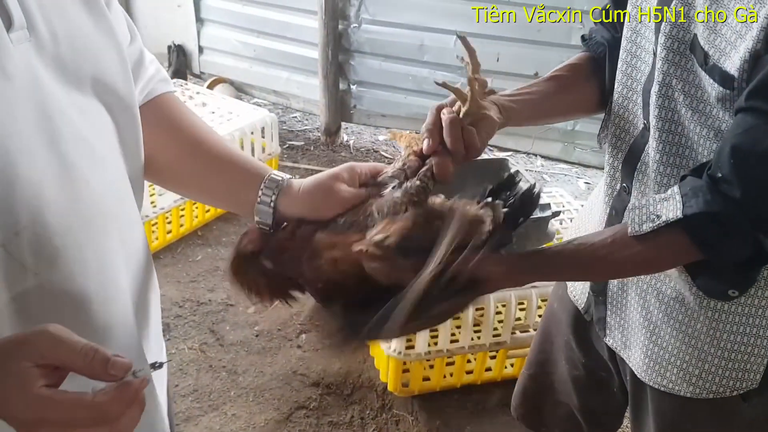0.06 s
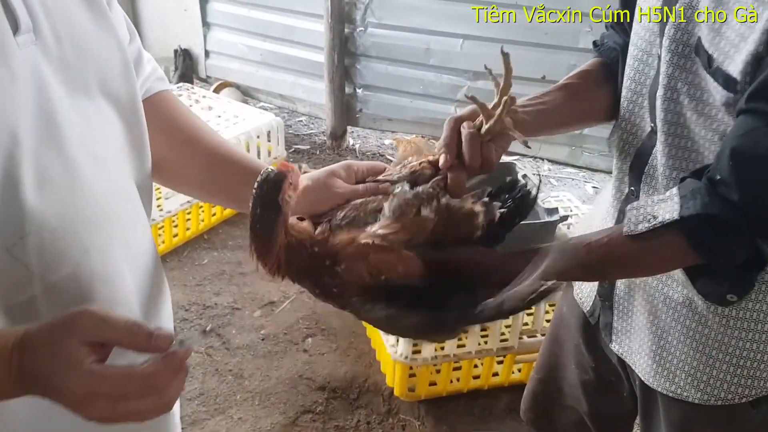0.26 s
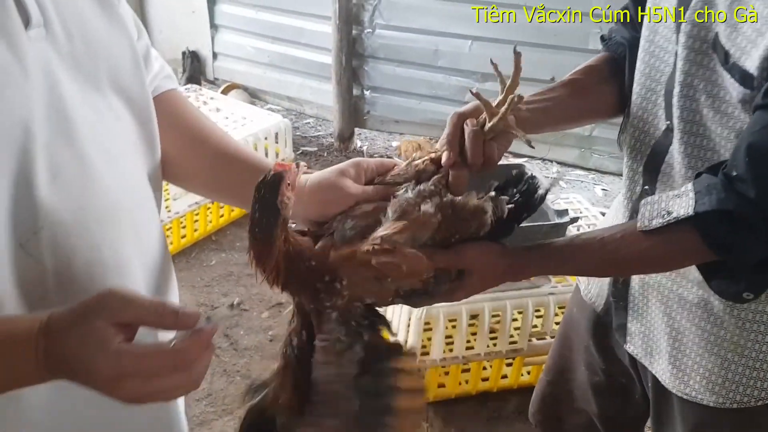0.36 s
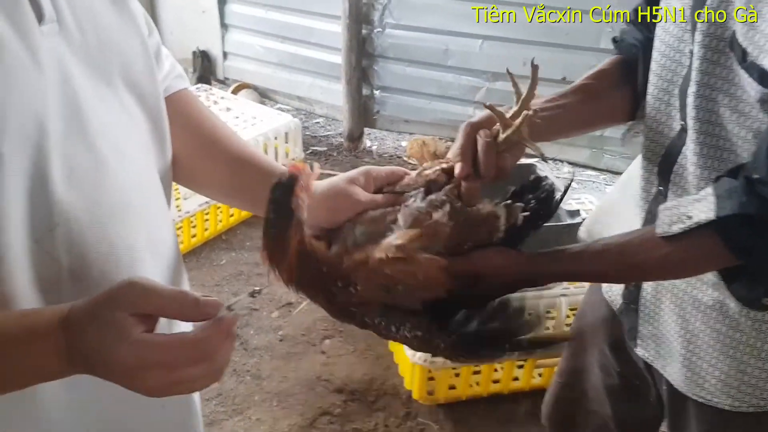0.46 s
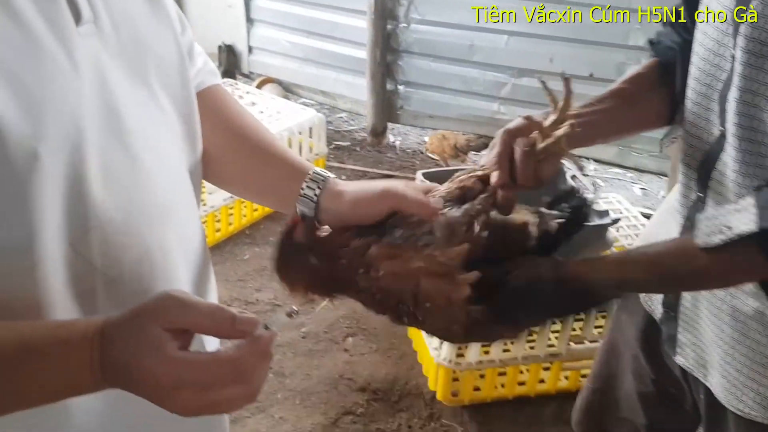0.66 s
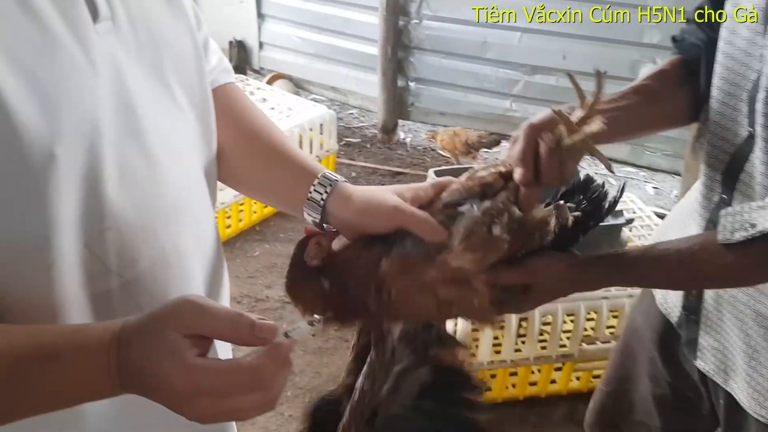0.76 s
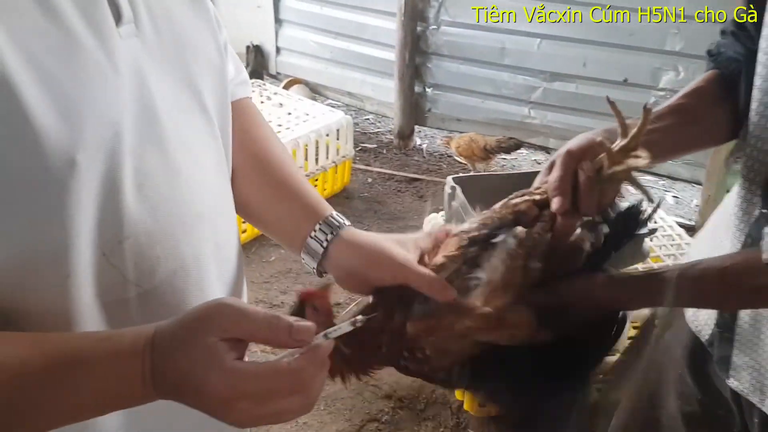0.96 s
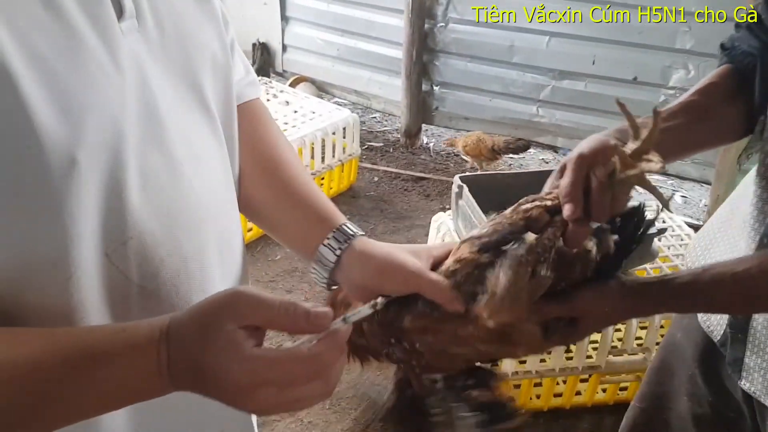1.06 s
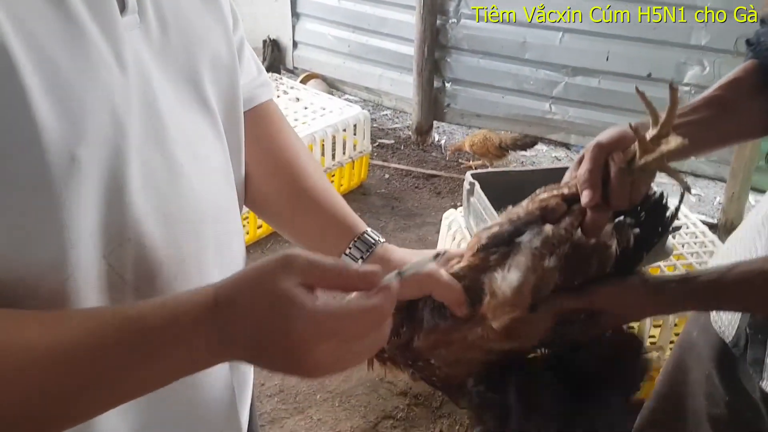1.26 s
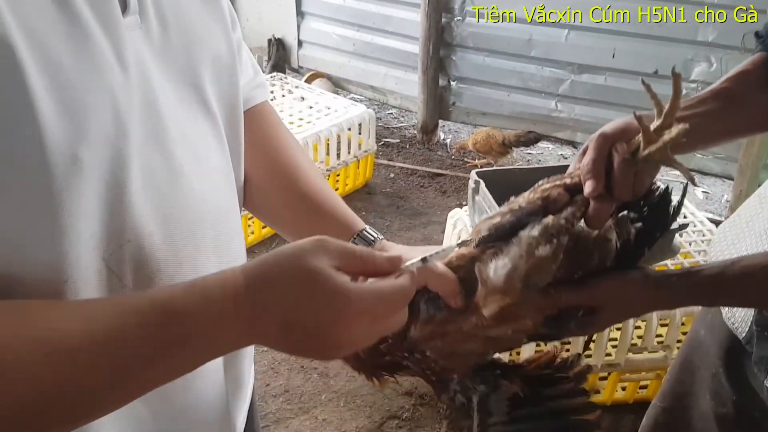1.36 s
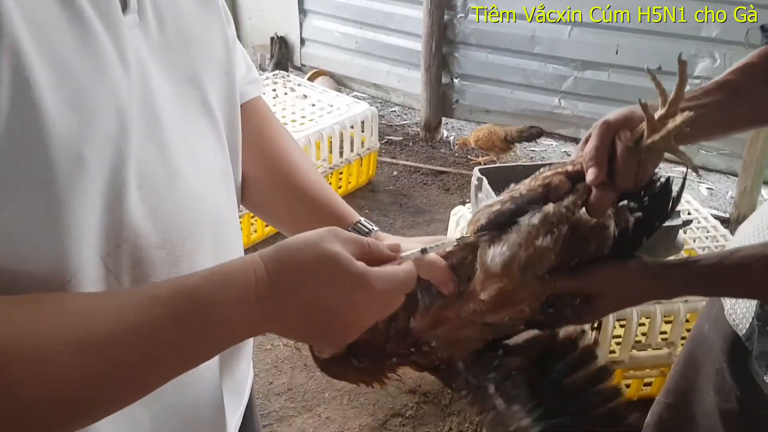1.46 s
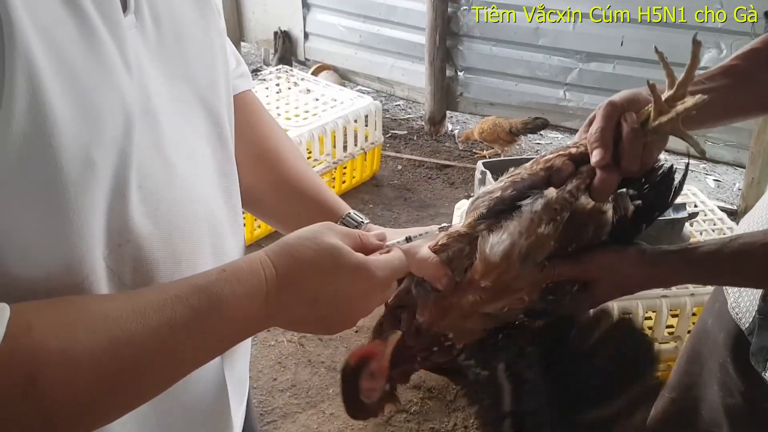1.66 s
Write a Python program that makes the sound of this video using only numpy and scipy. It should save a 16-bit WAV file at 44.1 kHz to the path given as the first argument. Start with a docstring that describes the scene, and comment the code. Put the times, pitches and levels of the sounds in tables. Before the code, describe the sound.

Two hoarse squawks come from a hen near the microphone, each after a thin, faint whine. Her feathers brush and click on the hands holding her, and a distant cluck and peep follow over a shed's soft rumble.

```python
"""Over a soft rumble in a sheet-metal shed, a hen held close by whines, her feathers brushing the hands.
She squawks: pulses and breath ring in her throat, swell into a rasp, then fall in pitch and colour as
the beak closes. She whines again and, with a rustle and a click, gives a second squawk. Two more clicks
follow, then, farther off, a low cluck and another bird's peep.
All along, the right microphone hears far more than the left."""
import sys
import numpy as np
from scipy import signal
from scipy.fft import rfft, irfft, next_fast_len
from scipy.io import wavfile
from scipy.ndimage import uniform_filter1d, minimum_filter1d, map_coordinates

SR = 44100
rng = np.random.default_rng(int(sys.argv[2]) if len(sys.argv) > 2 else 0)


def wav_out(sig):
    """Save sig, one row per channel (or a flat mono array), as 16-bit PCM at SR to the path in sys.argv[1]."""
    wavfile.write(sys.argv[1], SR, np.round(np.clip(np.atleast_2d(sig).T, -1, 1) * 32767).astype(np.int16))


N = 74970

# Tone colour of the rumble and of the faint hiss (frequency [Hz], level [dB]); all levels are relative
RUMBLE_COLOUR = [(20, -27.5), (35, -8.5), (48, -5.5), (75, -1), (105, -1), (150, -6.5), (190, -8.5),
                 (260, -16), (380, -27.5), (700, -36), (2000, -61)]
HISS_COLOUR = [(200, -45), (1200, 6), (2500, 4), (5000, -4), (8200, -4), (9400, 9), (10500, -6),
               (15500, -15.5)]
# How alike the noise is on the left and right (frequency [Hz], likeness [0-1])
STEREO_LIKENESS = [(50, 0.43), (500, 1), (1200, 0.18), (8000, 0.083)]
# The two thin whines, one table each (time [s], pitch [Hz], level [dB])
WHINE_NOTES = [
    [(0, 1265, -48), (.07, 1291, -51.5), (.11, 1258, -64.5), (.16, 1168, -56)],
    [(.70, 1274, -58), (.735, 1240, -53), (.765, 1275, -47), (.80, 1240, -64)],
]
# A whine's harmonics, the whole multiples of its pitch, lowest first (level [dB])
WHINE_HARMONICS = [0, -1.9, -29]
# Feathers brushing the hands (time [s], thump [dB], rustle [dB], rise [s], time to fade 60 dB [s])
FEATHER_BRUSHES = [(0.089, -69, -60, 0.003, 0.43), (0.158, -71, -46.5, 0.016, 0.22),
                   (.348, -36.5, -58, 0.0046, 0.12), (0.596, -37, -65, 0.0035, 0.19),
                   (.655, -61, -55.5, 0.036, 0.95), (0.803, -34.5, -47.5, 0.0025, .06),
                   (.814, -34.5, -37, 0.0079, 0.057), (1.264, -38.5, -42, .001, 0.023),
                   (1.277, -45.5, -41, 0.0019, 0.099), (1.684, -72, -52, 0.0081, 0.046)]
# Tone colour of a brush's thump and of its rustle (frequency [Hz], level [dB])
THUMP_COLOUR = [(60, -17), (180, 7.5), (330, -7), (550, 2), (1000, 0.5), (2500, -8.5), (6000, -39)]
RUSTLE_COLOUR = [(400, -17), (1500, 3.5), (3200, 1), (6000, -1.5), (9000, -8.5), (16000, -9.5)]
# The squeak that leads into the first squawk (time [s], pitch [Hz], level [dB])
SQUEAK_NOTE = [(.17, 1171, -53.5), (.198, 1286, -42), (.208, 1291, -25), (.222, 1348, -29),
               (.238, 1210, -60)]
# Its harmonics, lowest first (level [dB])
SQUEAK_HARMONICS = [-39.5, 4, -45.5, -18, -31.5, -35]
# The throat in each squawk (time [s], level [dB], ringing frequency [Hz], lowest harmonic [dB])
SQUAWK_THROATS = [
    [(0.218, -31, 2850, -78), (0.242, -28, 2860, -63), (0.332, -23.5, 2600, -52), (0.352, -27.5, 2880, -50),
     (0.4, -14, 2540, -33), (0.466, -17, 2600, -23), (0.48, -14, 2370, -38), (0.49, -20, 2170, -20),
     (0.524, -15.5, 1770, -24.5), (0.586, -30, 1250, -32.5), (0.596, -24, 1140, -35.5),
     (0.62, -34.5, 1200, -53)],
    [(0.83, -39, 2780, -65), (0.864, -25.5, 2810, -53), (0.958, -29, 3050, -66), (1.092, -19, 3100, -45),
     (1.108, -16.5, 2850, -29), (1.128, -15.5, 2270, -23.5), (1.156, -21.5, 1840, -30),
     (1.174, -23.5, 1463, -28.5), (1.2, -43, 1300, -44)],
]
# The voice in each squawk (time [s], pitch [Hz], roughness [0-1], sharpness of the ringing [Q])
SQUAWK_VOICES = [
    [(.22, 794.5, 0.91, 2.65), (.27, 829.4, 0.83, 1.8), (.31, 849.4, 0.43, 1.83), (.36, 853, 0.88, 1.14),
     (.39, 866.7, 0.56, 2.4), (.425, 846.2, 0.42, 2.1), (.46, 796.7, 0.46, 1.74), (.495, 790.6, 0.83, 1.86),
     (.527, 772.2, 0.24, 1.2), (.545, 575, 0.71, 1.6), (.572, 543.3, 0.74, 0.82), (.61, 357.7, 1, 5.4)],
    [(.84, 671.2, 0.42, 0.93), (.882, 713.3, 0.18, 3.4), (.897, 672, 0.27, 1.2), (.932, 690.2, 0.38, 2.1),
     (.948, 655.4, 0.22, 2.7), (1.0, 659.1, 0.3, 2.5), (1.032, 711.8, 0.65, 2.7), (1.06, 703.4, 0.77, 1.9),
     (1.1, 822.6, 0.71, 2.25), (1.132, 806.4, 0.71, 1.67), (1.148, 613.5, 0.05, 0.62),
     (1.166, 498, 0.64, 1.44), (1.19, 436.4, .7, 1.5)],
]
# Tone colour of the squawks' treble (frequency [Hz], level [dB])
TREBLE_COLOUR = [(3300, -18), (4300, -15), (4900, -23.5), (5550, -17), (6400, -6.5), (7500, 12.5),
                 (8200, -22), (9200, 7.5), (10200, 2.5), (11500, 10), (13500, 7), (16000, 4)]
# Treble against the throat at each squawk's peak (level [dB])
SQUAWK_TREBLES = [-19, -22]
# Feathers clicking on the hands (time [s], level [dB], centre [Hz], time to fade 60 dB [s])
FEATHER_CLICKS = [(.8203, -14, 13500, 0.0011), (1.2758, -28.5, 13100, 0.0017), (1.369, -47.5, 4670, 0.0113)]
# Tone colour of a click (frequency [multiple of the centre], level [dB])
CLICK_COLOUR = [(.05, -15), (.35, -10.5), (.65, -4.5), (1, 9), (1.25, 9.5), (1.6, -19.5)]
# A high whistle inside the second squawk (time [s], pitch [Hz], level [dB])
HIGH_NOTE = [(.925, 4330, -62), (.95, 4615, -30), (.97, 4450, -43), (.985, 4570, -35)]
# The cluck's harmonics, lowest first (level [dB])
CLUCK_HARMONICS = [-4, 1, 5.5, -22, -0.5, -8, -6.5, -10, -23, -20, -21, -23.5, -20, -28, -30, -34.5, -23,
                   -19, -39]
# Tone colour of the cluck's grit (frequency [Hz], level [dB])
GRIT_COLOUR = [(100, -12), (200, 15.5), (350, -5.5), (700, 5), (1800, -25), (2500, -36), (3300, -20),
               (4100, -11.5), (5000, -25.5), (12000, -35)]
# The other bird's peep (time [s], pitch [Hz], level [dB])
PEEP_NOTE = [(1.605, 2120, -79), (1.626, 1823, -52), (1.642, 1950, -46.5), (1.668, 2112, -46),
             (1.68, 2141, -51), (1.69, 1940, -39), (1.7, 1900, -64)]
# Its harmonics, lowest first (level [dB])
PEEP_HARMONICS = [0.5, -3.5, -13.5, -21]
# How long the shed rings (frequency [Hz], time to fade 60 dB [s])
SHED_FADE = [(150, 0.68), (700, 0.28), (2000, 0.26), (7000, 0.3), (15000, 0.24)]
# Muffling of the left microphone (frequency [Hz], gain [dB])
LEFT_MUFFLING = [(60, -14.5), (200, -18.5), (600, -15.5), (1290, -11), (2380, -14.5), (4400, -21.5),
                 (6000, -25), (8500, -12.5), (13000, -16)]

PULSE_SPREAD = 0.45  # the windpipe spreads each pulse over its cycle [radians]


def amp(db):
    """Turn decibels into a multiplier."""
    return 10 ** (np.asarray(db) / 20)


def unit(x):
    """Scale x to an average (rms) level of 1."""
    return x / np.sqrt(np.mean(x ** 2) + 1e-20)


def clock():
    """The time of each sample in seconds."""
    return np.arange(N) / SR


def along(points, hz):
    """Read between (frequency, value) points on a log scale."""
    frequencies, values = np.transpose(points)
    return np.interp(np.log(hz + 1), np.log(frequencies + 1), values)


def curves(rows):
    """One value per sample for each column after the time."""
    times, *columns = np.transpose(rows)
    return [np.interp(clock(), times, column) for column in columns]


def gate(start, end, rise=0.002, fade=0.024):
    """A volume that rises at start and dies away after end, all in seconds."""
    t = clock()
    return np.clip((t - start) / rise, 0, 1) * np.exp(-np.maximum(t - end, 0) / fade)


def wobble(rate):
    """A smooth curve through `rate` random values a second."""
    return map_coordinates(rng.standard_normal(N // 8), [clock() * rate], mode="wrap")


def filtered(x, response):
    """Turn each frequency in x up or down by response(hz)."""
    size = next_fast_len(N + SR // 2)
    return irfft(rfft(x, size) * response(np.fft.rfftfreq(size, 1 / SR)), size)[..., :N]


def coloured(x, colour):
    """Give x a tone colour, at level 1."""
    return unit(filtered(x, lambda hz: amp(along(colour, hz))))


def noise(colour):
    """Fresh noise with a tone colour."""
    return coloured(rng.standard_normal(N), colour)


def steady(x, samples=900):
    """Even out slow changes in level."""
    return x / np.sqrt(np.abs(uniform_filter1d(x * x, samples)) + 1e-12)


def background(colour):
    """Steady stereo noise, more alike on both sides in the bass."""
    turn = lambda hz: np.arccos(np.clip(along(STEREO_LIKENESS, hz), -1, 1)) / 2
    shares = lambda hz: np.array([np.cos(turn(hz)), np.sin(turn(hz))])
    mid, side = filtered(rng.standard_normal((2, N)), shares)
    return coloured(np.array([mid + side, mid - side]), colour)


def tone(pitch, harmonics, jitter):
    """A stack of harmonics whose pitch trembles by the fraction `jitter`."""
    phase = 2 * np.pi * np.cumsum(pitch * (1 + jitter * wobble(350))) / SR
    return unit(sum(amp(db) * np.cos((k + 1) * phase - PULSE_SPREAD * k * k)
                    for k, db in enumerate(harmonics)))


def whistle(note, harmonics, jitter):
    """A bird's thin, gliding note: a whine, a squeak or a peep."""
    pitch, level_db = curves(note)
    return amp(level_db) * tone(pitch, harmonics, jitter) * gate(note[0][0], note[-1][0])


def feather_brushes():
    """Feathers rub on the hands, each time with a soft thump and a rustle."""
    thump, rustle = noise(THUMP_COLOUR), noise(RUSTLE_COLOUR)
    return sum((amp(thump_db) * thump + amp(rustle_db) * rustle)
               * gate(start, start + rise, rise, fade / np.log(1000))
               for start, thump_db, rustle_db, rise, fade in FEATHER_BRUSHES)


def throat(x, centre_hz, q, steep=0.84):
    """The throat rings around a gliding frequency; a higher q makes the ringing sharper."""
    hz, t, spectrum = signal.stft(x, SR, nperseg=256, noverlap=192)
    ratio = (hz[:, None] + 1) / np.interp(t, clock(), centre_hz)
    sharpness = np.interp(t, clock(), np.broadcast_to(q, N))
    gain = (1 + (sharpness * (ratio - 1 / ratio)) ** 2) ** -steep
    return signal.istft(spectrum * gain, SR, nperseg=256, noverlap=192)[1][:N]


def squawk(shape, voice, treble_db):
    """Uneven pulses and puffs of breath ring in the throat; more breath makes a rougher call."""
    level_db, centre_hz, low_db = curves(shape)
    pitch, rough, q = curves(voice)
    start, end = shape[0][0], shape[-1][0]
    jitter = 0.06042 * np.sqrt(rough) * wobble(498.8)
    phase = 2 * np.pi * np.cumsum(pitch * (1 + jitter)) / SR
    pulses = sum(amp(-7 * np.log2(k)) * np.cos(k * phase - PULSE_SPREAD * k * k)
                 for k in range(2, 24))  # harmonics fall 7 dB an octave
    breath = unit((1 + 0.5 * np.cos(phase)) * rng.standard_normal(N))  # one puff a cycle
    blend = lambda clear, hoarse: np.sqrt(1 - rough) * steady(clear) + np.sqrt(rough) * steady(hoarse)
    source = blend(pulses, breath)

    body = blend(throat(pulses, centre_hz, q, steep=1), throat(breath, centre_hz, q, steep=1.026))
    # Two higher bands of ringing glide with the main one.
    shrill = amp(-17) * steady(throat(source, 1.21 * centre_hz, q=7.8))
    upper = amp(-25) * steady(throat(source, 6680 * (centre_hz / 2570) ** 0.26, q=10, steep=1))
    treble = blend(coloured(pulses, TREBLE_COLOUR), coloured(breath, TREBLE_COLOUR))
    treble += 0.47 * noise(TREBLE_COLOUR)
    top = upper + amp(treble_db) * steady(treble)
    top *= amp(0.3 * (level_db - level_db.max()))  # more effort sounds brighter
    call = amp(level_db - 0.5) * (steady(body + shrill, samples=300) + top)
    call *= amp(0.84 * wobble(61))  # the effort is uneven
    call *= gate(start, end, rise=0.0044, fade=0.028)

    # The lowest harmonic has its own level and turns breathy when rough.
    low_breath = 0.33 * rough * steady(throat(breath, pitch, q=9))
    low = amp(low_db - 2.5) * steady(np.cos(phase) + low_breath)
    low *= gate(start, end, rise=0.004, fade=0.005)
    flutter = amp(1.5 * wobble(225.2))
    return (call + low) * flutter


def feather_clicks():
    """Feathers click against the hands in tiny, sharp bursts of noise."""
    return sum(amp(db) * gate(start, start, 1 / SR, fade / np.log(1000))
               * noise(np.multiply(CLICK_COLOUR, [hz, 1]))
               for start, db, hz, fade in FEATHER_CLICKS)


def cluck(start=1.483, length=0.025, pitch_hz=234.4):
    """One short, low note, made gritty by noise."""
    volume = amp(-39.5) * gate(start, start + length, rise=0.021, fade=0.029)
    grit = amp(-2.5) * noise(GRIT_COLOUR)
    return volume * (tone(pitch_hz, CLUCK_HARMONICS, jitter=0.0296) + grit)


def shed(x, bounces=10, walls_db=-4, tail_db=-8.5):
    """Sound bounces off the near walls and blurs into a short tail of echoes."""
    white_noise = background([(100, 0), (10000, 0)])[:, :SR // 2]
    hz, t, spectrum = signal.stft(white_noise, SR, nperseg=256)
    tail = signal.istft(spectrum * amp(-60 * t / along(SHED_FADE, hz)[:, None]), SR, nperseg=256)[1]
    tail[:, :SR // 200] = 0  # the tail starts after 5 ms
    echoes = amp(tail_db) * tail / np.linalg.norm(tail[0])
    for delay, skew, sign in rng.random((bounces, 3)):
        for channel in range(2):
            arrival = int((0.002 + 0.018 * delay) * SR + channel * 8 * skew)
            echoes[channel, arrival] += np.sign(sign - 0.5) * amp(walls_db) / np.sqrt(bounces)
    return signal.fftconvolve(x[None], echoes, axes=1)[:, :N]


def scene():
    """In stereo: the hen and hands are near; the cluck and peep are farther off, with more echo."""
    near = sum(squawk(*call) for call in zip(SQUAWK_THROATS, SQUAWK_VOICES, SQUAWK_TREBLES))
    near += feather_brushes() + feather_clicks()
    near += whistle(SQUEAK_NOTE, SQUEAK_HARMONICS, jitter=0.034)
    near += whistle(HIGH_NOTE, harmonics=[0], jitter=0.0036)
    near += sum(whistle(note, WHINE_HARMONICS, jitter=0.005) for note in WHINE_NOTES)
    far = cluck() + whistle(PEEP_NOTE, PEEP_HARMONICS, jitter=0.007)
    direct = np.array([amp(-5) * (near + far), near + far])  # the left microphone faces away
    birds = amp(-0.5) * (direct + shed(near + amp(2) * far))
    return birds + amp(-47.5) * background(RUMBLE_COLOUR) + amp(-64.5) * background(HISS_COLOUR)


def record(dry):
    """The left microphone is muffled, a limiter turns down the peaks, and the highest treble is cut."""
    ceiling, reaction_s, top_hz = 0.76, 0.0017, 16000
    left = filtered(dry[0], lambda hz: amp(along(LEFT_MUFFLING, hz)))
    pair = amp(4) * np.array([left, dry[1]])
    needed = np.minimum(1, ceiling / (np.abs(pair).max(axis=0) + 1e-9))
    span = int(reaction_s * SR) + 1
    gain = uniform_filter1d(minimum_filter1d(needed, 2 * span), span)
    return filtered(pair * gain, lambda hz: hz < top_hz)


dry = scene()
out = record(dry)
wav_out(out)
```